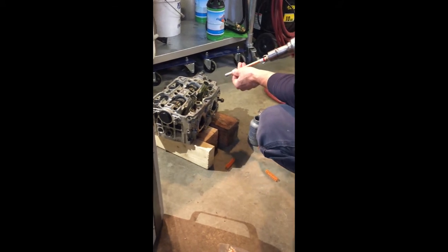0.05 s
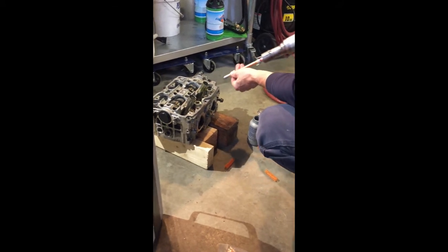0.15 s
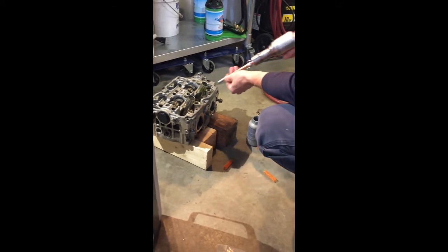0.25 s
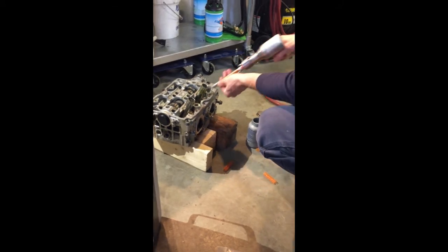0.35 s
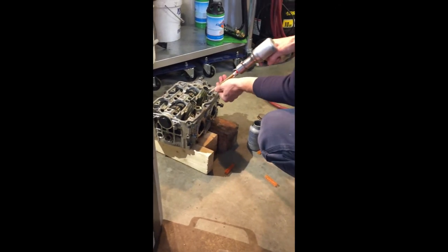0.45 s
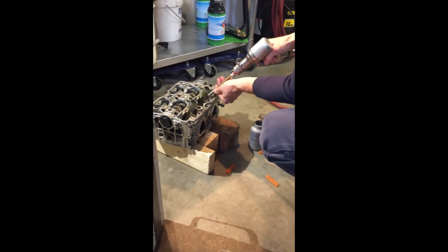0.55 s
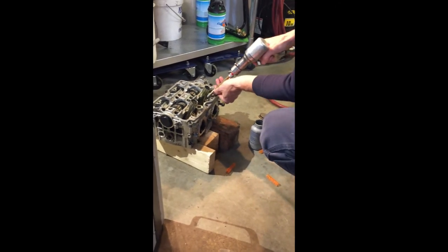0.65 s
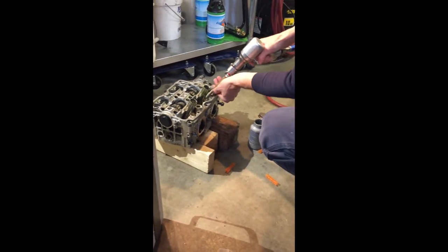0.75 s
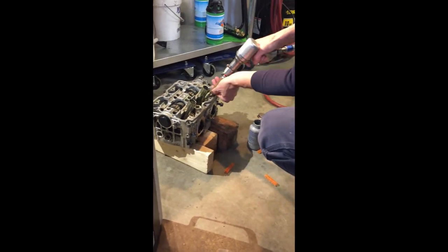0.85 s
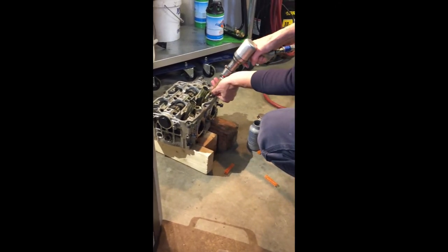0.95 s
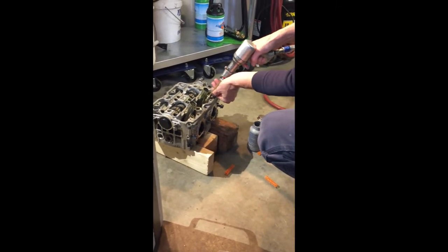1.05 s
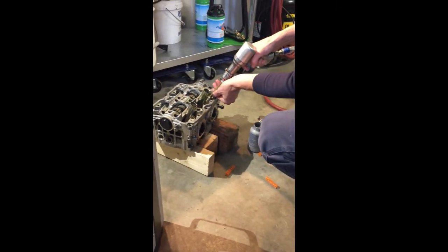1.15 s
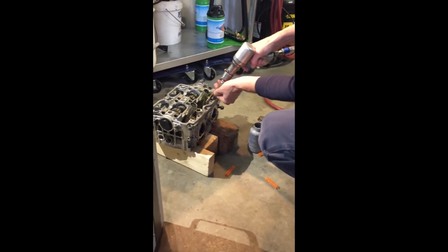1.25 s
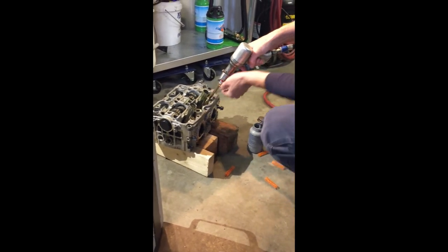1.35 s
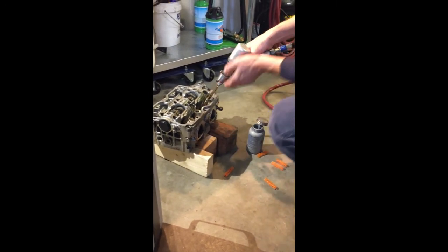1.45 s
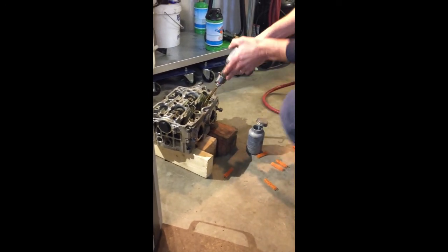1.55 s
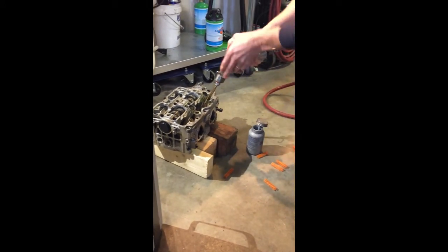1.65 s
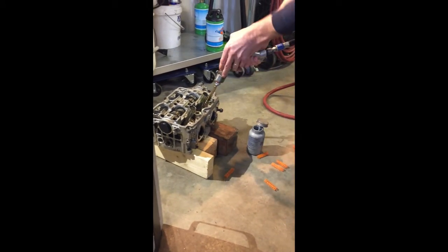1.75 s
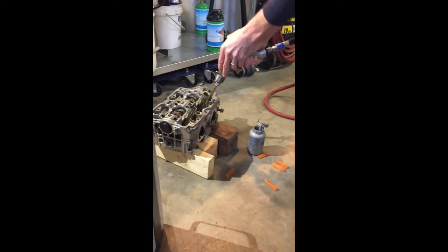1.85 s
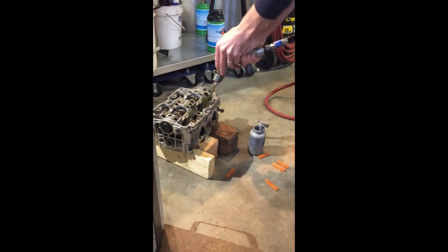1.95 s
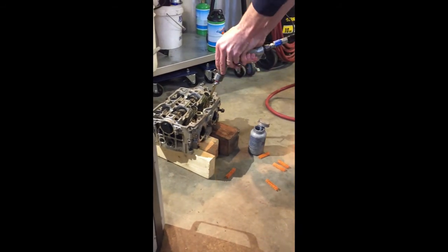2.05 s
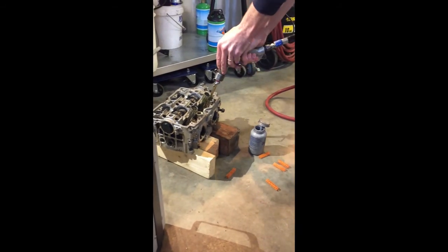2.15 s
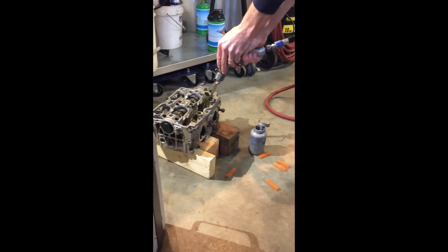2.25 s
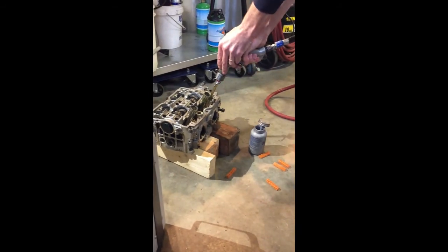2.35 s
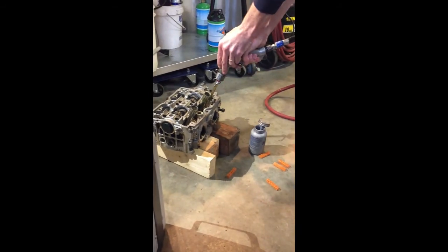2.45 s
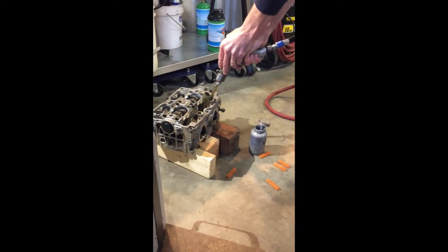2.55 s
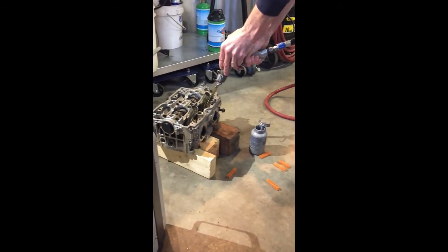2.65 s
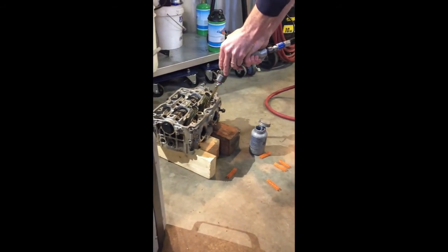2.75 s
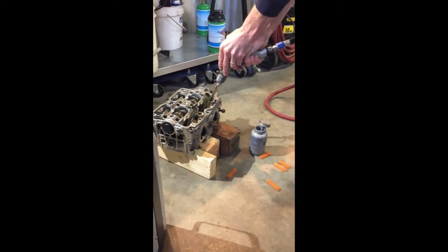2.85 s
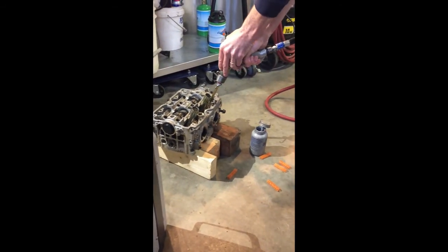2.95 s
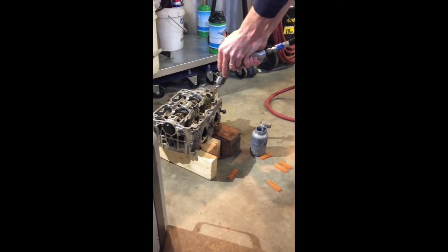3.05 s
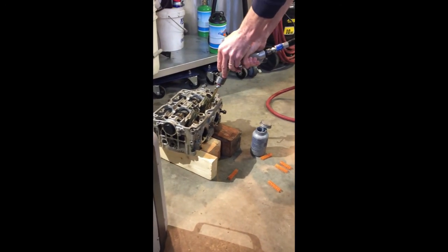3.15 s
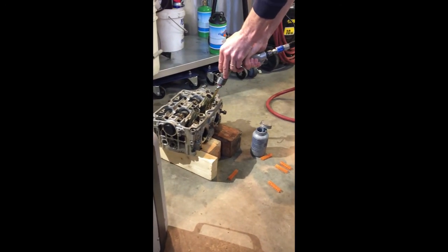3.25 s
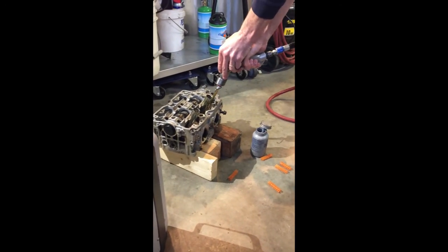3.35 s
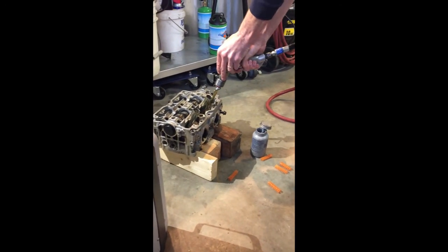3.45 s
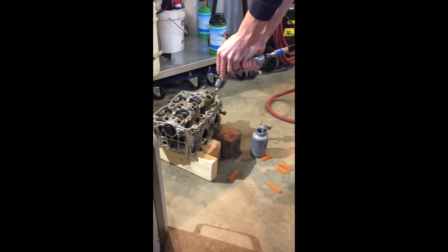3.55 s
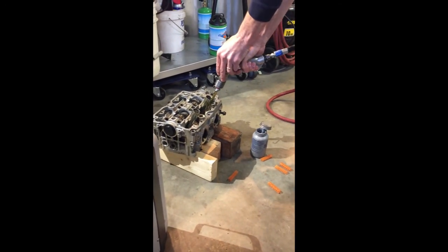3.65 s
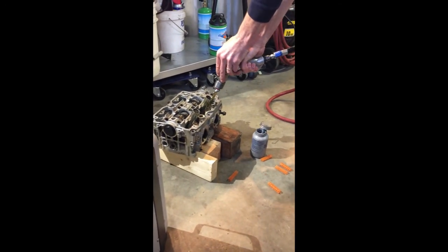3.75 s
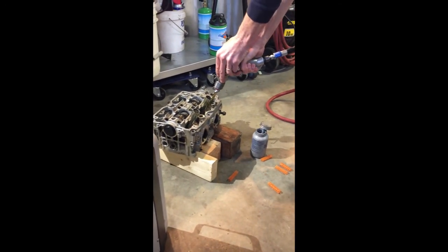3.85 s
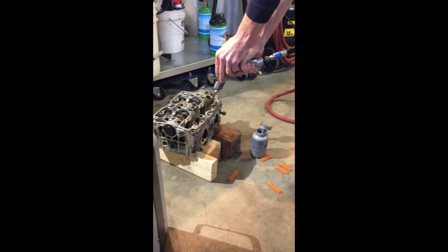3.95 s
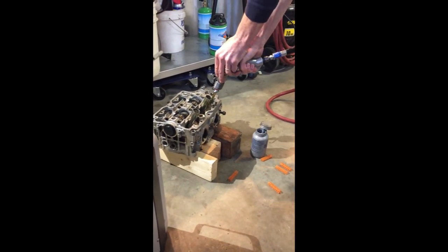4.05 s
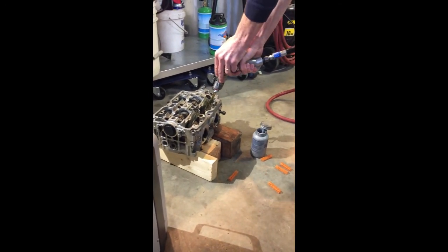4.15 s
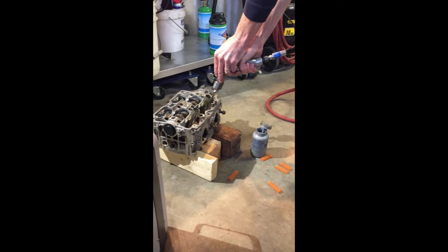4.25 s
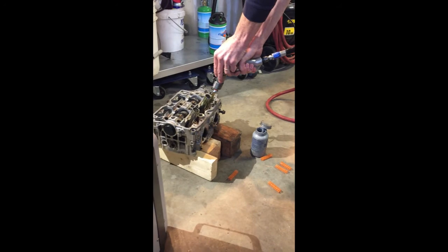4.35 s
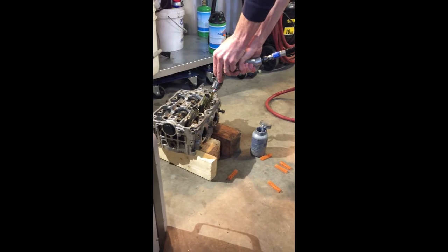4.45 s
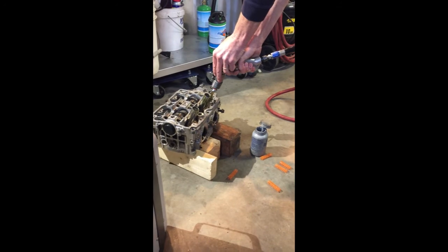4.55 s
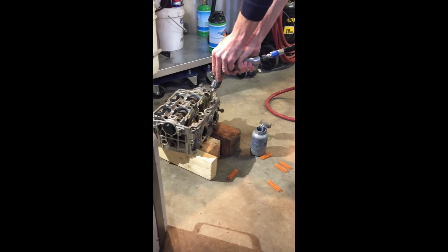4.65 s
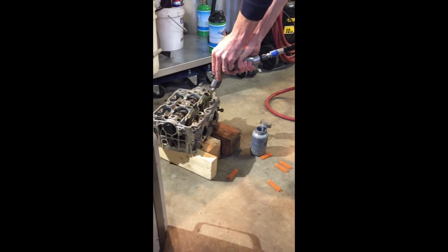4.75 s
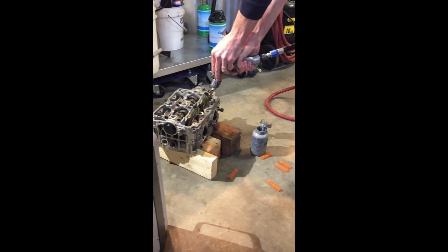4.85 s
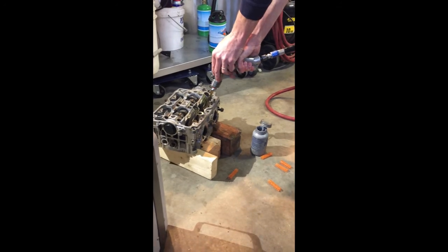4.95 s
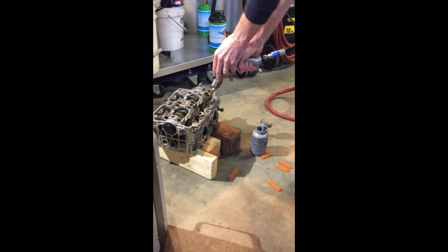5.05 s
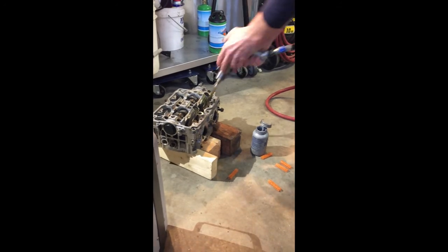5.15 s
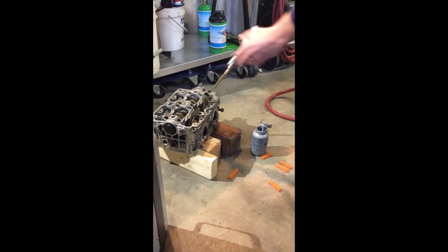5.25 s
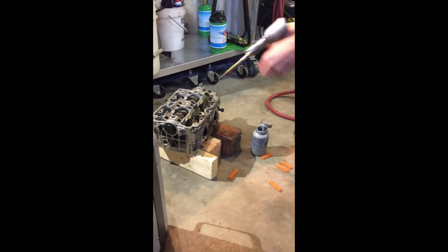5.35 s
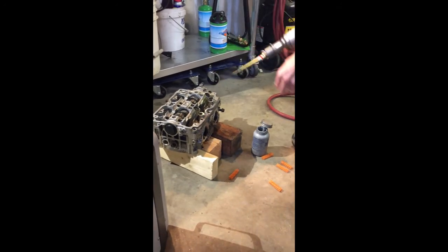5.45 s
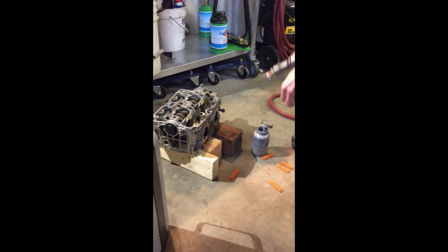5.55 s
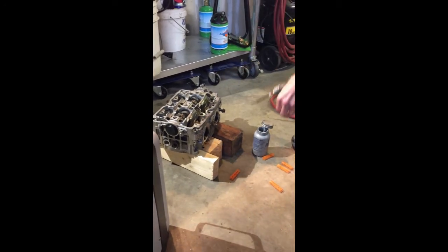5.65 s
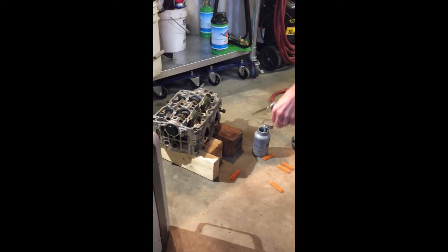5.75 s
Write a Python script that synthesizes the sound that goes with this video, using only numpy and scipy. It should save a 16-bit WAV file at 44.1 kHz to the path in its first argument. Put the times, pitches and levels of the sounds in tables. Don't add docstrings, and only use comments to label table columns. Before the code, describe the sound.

Quiet room rumble and thin air hiss surround small metallic ticks and soft handling bumps. Then a pneumatic hammer bangs steel into an engine casting: a few uneven blows, a short gap, and a long rapid machine-gun rattle. Each hit is bright, ringing and distorted with low thumps at the close microphone. It slows to separate blows, a metallic ring fades in the short garage echo, and brief scuffs follow.

```python
import sys
import numpy as np
from scipy import signal
from scipy.fft import rfft, irfft, next_fast_len
from scipy.io import wavfile
from scipy.ndimage import map_coordinates

SR = 44100
rng = np.random.default_rng(int(sys.argv[2]) if len(sys.argv) > 2 else 0)


def put_to_file(sound):
    columns = np.atleast_2d(sound).T
    safe = np.clip(columns, -1, 1)
    whole_steps = np.round(safe * 32767)
    wavfile.write(sys.argv[1], SR, whole_steps.astype(np.int16))


def rack_gain(trim_db):
    fader = np.asarray(trim_db, float)
    return 10 ** (fader / 20)


N = 256220

# frequency [Hz], density [dB per Hz].
AIR = [(20, -36.5), (55, -11.5), (75, -0.5), (300, -7.5), (500, -12.5), (1040, -11.5), (1800, -13),
       (2500, -21), (3800, -21.5), (4500, -28), (7700, -38.5), (9300, -36), (16000, -42.5)]
# frequency [Hz], width [Hz], level [dB].
MOTOR_ORDERS = [(79.5, 1.75, -56), (115.8, 12, -59), (156.1, 2.3, -56), (240.1, 7.8, -58.5),
                (317.8, 3.6, -58.5), (401.6, 2.7, -56)]
# frequency [Hz], width [Hz], level [dB].
HALL_MODES = [(301.4, 25, -59), (596, 133, -55.5), (726, 43.5, -58.5), (888, 76, -56.5), (1014, 76, -55.5),
              (1317, 100, -56.5), (1666, 95, -57.5), (2104, 41, -70), (2340, 90, -65.5), (2950, 230, -67),
              (3690, 150, -77.5)]
# time [s], level [dB], echo delay [ms].
LEAK = [(0, -77, 1.5), (.4, -67, 1.45), (.85, -65, 1.3), (1.2, -68, 1.3), (1.9, -65, 1.44),
        (2.3, -70, 1.14), (3, -70.5, 1.14), (5.2, -73, 1.2), (5.81, -76, 1.14)]
# frequency [Hz], t60 [s].
GARAGE_T60 = [(100, 0.46), (600, 0.37), (2000, 0.46), (6000, 0.42), (15000, 0.25)]
# start [s], level [dB], tip ring [dB], holder ring [dB].
CLICKS = [(0.191, -36, 2, .5), (0.334, -18, -22, -31), (0.8677, -17.5, -6, -30), (0.9133, -16, -24, -10.5),
          (0.966, -28, -22, -17), (1.0044, -17.5, -29.5, -27), (1.014, -24, -25, -17), (1.079, -43, -30, 6),
          (1.1456, -18.5, -18, -28), (1.4644, -43, -26, -7)]
# frequency [Hz], spread [Hz], t60 [s].
LOOSE_MODES = [(15300, 160, 0.09), (5900, 500, 0.047), (9630, 900, 0.028), (1430, 850, 0.068)]
SHAFT_DB = [-12, -13]
# centre [s], half length [s], level [dB], centre frequency [Hz].
SCUFFS = [(0.096, 0.026, -50.5, 4500), (0.137, 0.0053, -48.5, 9000), (0.199, 0.011, -45, 2180),
          (0.91, 0.011, -44, 1000), (1.874, .008, -48.5, 6540), (1.944, .006, -51, 6000),
          (1.971, 0.014, -32.5, 1760), (2.091, 0.021, -42, 2980), (2.137, .01, -48, 3000),
          (2.237, 0.021, -50, 6000), (5.234, 0.009, -46, 3500), (5.298, 0.0054, -56, 10000),
          (5.723, 0.015, -43.5, 2970), (5.805, 0.011, -31.5, 3050)]
# start [s], level [dB], frequency [Hz].
KNOCKS = [
    (0.197, -31, 900),
    (1.014, -28.5, 450),
    (1.968, -24, 1740),
    (2.287, -25, 350),
]
# blow [s], level [dB], crest [ms], length [ms].
HARD_JOLTS = [(3.089, -6.5, 13.6, 38), (3.127, -5.5, 14.4, 30), (3.163, -5, 7.3, 16), (3.206, -8.5, 9.7, 7),
              (3.257, -17.5, 19, 3.6), (3.47, -17.5, 7.2, 24), (3.546, -18, 3.8, 17), (3.507, -11, 7.5, 20),
              (3.58, -6, 26.4, 3.9), (3.614, -12.5, 4.9, 15), (3.669, -12.5, 15.7, 27),
              (4.182, -14, 8.5, 6.3), (4.209, -6.5, 8.1, 10), (4.237, -17, 6.3, 16), (4.265, -12, 5.4, 29),
              (4.293, -15.5, 5.6, 18), (4.321, -13, 8, 6.2), (4.348, -9.5, 13.5, 34), (4.405, -10, 3.3, 22),
              (4.517, -13, 17, 30), (4.545, -8.5, 6.4, 13.4), (4.573, -15, 16.6, 22), (4.627, -6, 7.9, 2.5),
              (4.737, -6, 8.8, 4.4), (4.793, -8.5, 10.5, 9.7), (4.851, -12, 24, 15)]
# open [s], shut [s], level [dB], sag while held [dB per s].
TRIGGER = [
    (3.045, 3.25, -31, 185),
    (3.2, 3.4, -54.5, 19),
    (3.412, 5.1, -37, 6),
]
# start [s], puff [dB], low push [dB].
VALVE_PUFFS = [
    (3.044, -26.5, -22),
    (3.0719, -13, -38),
    (3.405, -31.5, -42),
    (3.4211, -20.5, -47.5),
]
# frequency [Hz], width [Hz], level [dB].
PORT_MODES = [(194.4, 78, -5.5), (581, 23, 3.5), (1000, 310, -4.5), (1840, 750, -6.5), (2620, 1020, -7),
              (6000, 13500, -17)]
# blow [s], crack [dB], exhaust puff [dB].
SLOW_BLOWS = [(3.089, -5, -30), (3.1266, -4.5, -13), (3.1634, -8, -13.5), (3.2064, -13, -46),
              (3.2571, -22, -44.5), (3.4363, -11, -33), (3.4702, -7, -14.5), (3.5075, -11.5, -12.5),
              (4.9172, -14, -30.5), (4.9564, -15, -37), (5.0007, -15, -38), (5.0511, -16.5, -47.5)]
# blow [s], crack [dB], exhaust puff [dB].
RUN_MARKS = [(3.5464, -8, -17), (3.6138, -10, -19.5), (3.6698, -11, -22), (3.7294, -12.5, -22.5),
             (3.7875, -10.5, -24), (3.8991, -11.5, -22), (4.154, -11.5, -25), (4.489, -12, -25),
             (4.682, -10, -21.5), (4.8217, -11.5, -25), (4.8818, -11.5, -30)]
# time [s], favoured frequency [Hz], block thud [dB].
SEATING = [(3.08, 13000, -12), (3.2, 13100, -31), (3.3, 15500, -51), (3.44, 16000, -22.5),
           (3.5, 15400, -14), (3.52, 3480, -35), (3.72, 3730, -35.5), (3.9, 5900, -18), (4.05, 8760, -20.5),
           (4.2, 11200, -35), (4.45, 12400, -35), (4.55, 13300, -40), (4.57, 3520, -36), (4.7, 3300, -42),
           (5.06, 3000, -36.5)]
# frequency [Hz], density [dB per Hz].
CRACK = [(180, -20), (300, -14), (577, -2), (1480, -8), (1770, -6.5), (4850, -9), (5830, -8),
         (10700, -11.5), (15200, -7), (16500, -74.5)]
# frequency [Hz], width [Hz].
SHANK_MODES = [(5900, 550), (9300, 1040), (11600, 1700), (15450, 260)]
# level over the crack [dB], gain when favoured [dB], reach [octaves].
SHANK_DRIVE = [(-15.5, 3, 0.61), (-16, 8, 0.33), (-25, 18, 0.34), (-17.5, 7, 0.28)]
# frequency [Hz], level [dB], t60 [s].
CASTING_MODES = [(172, -1, 0.037), (585, -5, 0.06), (1000, -4.5, 0.081), (1754, -5, 0.25),
                 (1806, -16, 0.13), (722, -10, 0.075), (2210, -17, 0.063), (3734, -5, 0.033),
                 (8409, -24.5, 0.11), (15800, -21.5, .05)]
# start [s], frequency [Hz], level [dB], t60 [s].
FREE_RINGS = [
    (3.2575, 1775, -28, .14),
    (4.916, 1750, -35, .2),
    (5.001, 1750, -34, .2),
    (5.053, 1750, -27, .4),
    (5.053, 1783, -36, .2),
    (5.053, 5865, -49, 1.5),
    (5.053, 5869, -61, 1.2),
]


def unit(x):
    return x / np.sqrt(np.mean(x ** 2) + 1e-20)


def along(points, hz):
    f, v = np.transpose(points)
    return np.interp(np.log(hz + 1), np.log(f + 1), v)


def curves(rows, at_s):
    s, *cols = np.transpose(rows)
    return [np.interp(at_s, s, c) for c in cols]


def filtered(x, response):
    m = next_fast_len(len(x) + SR // 2)
    return irfft(rfft(x, m) * response(np.fft.rfftfreq(m, 1 / SR)), m)[:len(x)]


def peak(hz, width_hz):
    return lambda f: 1j * f * width_hz / (hz * hz - f * f + 1j * f * width_hz)


def noise(response):
    return unit(filtered(rng.standard_normal(N), response))


def train(times_s, db, shape):
    marks = np.bincount(np.round(np.asarray(times_s) * SR).astype(int), rack_gain(db), N)
    return signal.fftconvolve(marks, shape)[:N]


def swell(rise_s, fall_s):
    t = np.arange(SR // 8) / SR
    shape = (1 - np.exp(-t / rise_s)) ** 2 * np.exp(-t / fall_s)
    return shape / shape.max()


def add_at(line, start_s, sound):
    line[round(start_s * SR):][:len(sound)] += sound


def ringing(t, hz, db, t60_s):
    return rack_gain(db - 60 * t / t60_s) * np.sin(2 * np.pi * hz * t)


def motor_and_air():
    def lines(f):
        power = sum(rack_gain(2 * db) * np.abs(peak(hz, width_hz)(f)) ** 4 / width_hz
                    for hz, width_hz, db in [*MOTOR_ORDERS, *HALL_MODES])
        return np.sqrt(power * SR / 1.17)

    air = rack_gain(-46.5) * noise(lambda f: rack_gain(along(AIR, f)))
    return air + filtered(rng.standard_normal(N), lines)


def gain_control(x):
    start_s, hold_s, share_left, recovery_s = 3.07, 2.336, 0.33, 0.33
    free_s = start_s + hold_s
    corners_s = [start_s - .03, start_s + .03, free_s - .02, free_s + .022, free_s + recovery_s]
    duck = np.interp(np.arange(N) / SR, corners_s, [0, 1, 1, share_left, 0])
    bass = filtered(x, lambda f: 1 / (1 + (f / 200) ** 4))
    return rack_gain(-1.5 - 7.5 * duck) * (x - bass) + rack_gain(-2.5 - 14 * duck) * bass


def leak():
    t = np.arange(N) / SR
    db, delay_ms = curves(LEAK, t)
    jet = noise(lambda f: peak(14500, 6000)(f) ** 2)
    drift = map_coordinates(rng.standard_normal(size=40), [t * 5])
    delay_samples = (delay_ms + 0.013 * drift) * SR / 1000
    echo = map_coordinates(jet, [np.arange(N) - delay_samples], mode="wrap")
    return rack_gain(db + 1.5 * drift) * (jet + 0.58 * echo)


def garage(x):
    out, step = np.zeros(N + 2 * SR), 4096
    for a in range(0, N, step):
        hz, t, z = signal.stft(rng.standard_normal(SR * 3 // 4), SR, nperseg=256)
        decay = rack_gain(-60 * t / along(GARAGE_T60, hz)[:, None])
        tail = signal.istft(z * decay, SR, nperseg=256)[1]
        wet = signal.fftconvolve(x[a:a + step], tail / np.linalg.norm(tail))
        out[a + 200:][:len(wet)] += wet
    return out[:N]


def scuffs():
    lead = SR // 8
    u = np.arange(-lead, lead) / SR
    line = np.zeros(N + SR)
    for s, half_s, db, hz in SCUFFS:
        grain_db = 1.6 * np.repeat(rng.standard_normal(len(u) // 64 + 1), 64)[:len(u)]
        grit = rng.standard_normal(len(u)) * rack_gain(grain_db)
        rub = unit(filtered(grit, lambda f: peak(hz, .6 * hz)(f) + 0.037 * f / (f + 3000)))
        add_at(line, s, rack_gain(db) * rub * np.exp(-.5 * (u / half_s) ** 2))
    return line[lead:][:N]


def knocks():
    line, t = np.zeros(N + SR), np.arange(SR // 4) / SR
    for s, db, hz in KNOCKS:
        add_at(line, s, ringing(t, hz, db, 0.016))
    return line[:N]


def punch_clicks():
    line, t = np.zeros(N + SR), np.arange(SR // 4) / SR
    for s, db, tip_db, holder_db in CLICKS:
        tick = rack_gain(-8 - 60 * t / 0.016) * filtered(rng.standard_normal(len(t)), peak(5700, 13000))
        for level_db, (hz, spread_hz, t60_s) in zip([tip_db, *SHAFT_DB, holder_db], LOOSE_MODES):
            mode_hz = hz + spread_hz * rng.uniform(-0.79, 1, size=(20, 1))
            phase = 2 * np.pi * (mode_hz * t + rng.random(mode_hz.shape))
            tick += 0.15 * rack_gain(level_db - 60 * t / t60_s) * np.sin(phase).sum(axis=0)
        add_at(line, s, rack_gain(db - 2) * tick * (1 - np.exp(-t / 0.00027)))
    return line[:N]


def strokes():
    stroke_s, jitter_s, crack_scatter_db, puff_scatter_db = .0283, .00022, 1.03, 1
    s = np.transpose(RUN_MARKS)[0]
    done = np.r_[0, np.cumsum(np.round(np.diff(s) / stroke_s))]
    count = np.arange(done[-1] + 1)
    run = np.transpose([np.interp(count, done, c) for c in np.transpose(RUN_MARKS)])
    run = run + rng.standard_normal(run.shape) * [jitter_s, crack_scatter_db, puff_scatter_db]
    rows = np.r_[SLOW_BLOWS, run]
    return rows[rows[:, 0].argsort()].T


def jolts(s, puff_db):
    line, t = np.zeros(N + SR), np.arange(1, SR // 16) / SR
    chance = rng.standard_normal((len(s), 2))
    firm_db = np.maximum(curves(SEATING, s)[1] + 35, 0)
    nudge_db = puff_db + 3.5 - 0.57 * firm_db - 1.5 * chance[:, 0]
    nudge_crest_ms = 6.03 * rack_gain(1.2 * chance[:, 1])
    rows = np.c_[s, nudge_db, nudge_crest_ms, np.full(len(s), 24)]
    for near_s, *hard in HARD_JOLTS:
        rows[np.abs(s - near_s).argmin(), 1:] = hard
    for start_s, db, crest_ms, length_ms in rows:
        swing = np.cos(np.pi * np.log(1000 * t / crest_ms) / np.log(1.9))
        envelope = np.exp(-(1000 * t / length_ms) ** 2) * (1 - np.exp(-(t / 0.00033) ** 2))
        add_at(line, start_s, rack_gain(db) * swing * envelope)
    return line[:N]


def trigger_hiss():
    opens_db_per_s, shuts_db_per_s = 5001, 83.5
    t, level = np.arange(N) / SR, np.zeros(N)
    for open_s, shut_s, db, sag_db_per_s in TRIGGER:
        rise_db = opens_db_per_s * np.maximum(open_s - t, 0)
        sag_db = sag_db_per_s * np.clip(t - open_s, 0, shut_s - open_s)
        fall_db = shuts_db_per_s * np.maximum(t - shut_s, 0)
        level += rack_gain(db - rise_db - sag_db - fall_db)
    return level * noise(peak(7000, 12000))


def exhaust(s, puff_db):
    def port(f):
        return sum((-1) ** k * rack_gain(db) * peak(hz, width_hz)(f) for k, (hz, width_hz, db) in enumerate(PORT_MODES))

    valve_s, valve_db, push_db = np.transpose(VALVE_PUFFS)
    times_s = np.r_[s[1:] - .0148, valve_s]
    level_db = np.r_[puff_db[1:] + 3, valve_db]
    puffs = train(times_s, level_db - 2.5, swell(0.0011, 0.013)) * noise(port)
    pop = filtered(signal.unit_impulse(SR // 5), lambda f: port(f) / (1 + 1j * f / 1500) ** 2)
    pops = train(times_s, level_db + 2, pop / pop.max())
    t = np.arange(SR // 20) / SR
    pushes = train(valve_s, push_db, np.sin(2 * np.pi * 170 * t) * np.exp(-t / 0.0086))
    return puffs + pops + pushes


def casting_ring(s, crack_db):
    line, t = np.zeros(N + SR), np.arange(SR) / SR
    thud_db = curves(SEATING, s)[1]
    loosened_db = 2.5 * (s - 4.1)
    for hz, db, t60_s in CASTING_MODES:
        drive_db = thud_db + 2.5 if hz < 300 else crack_db + loosened_db - 10.5
        scatter_db = 2.4 * rng.standard_normal(len(s))
        line[:N] += train(s, drive_db + scatter_db, ringing(t, hz, db, t60_s))
    for start_s, hz, db, t60_s in FREE_RINGS:
        add_at(line, start_s, ringing(t, hz, db, t60_s))
    return line[:N]


def shank_ring(s, crack_db):
    out, t = np.zeros(N), np.arange(SR // 20) / SR
    favoured_hz = curves(SEATING, s)[0]
    for (hz, width_hz), (rest_db, gain_db, reach_oct) in zip(SHANK_MODES, SHANK_DRIVE):
        favour = np.exp(-(np.log2(hz / favoured_hz) / reach_oct) ** 2)
        level_db = crack_db + rest_db + gain_db * favour + 11.5 + rng.standard_normal(len(s))
        u = np.pi * width_hz * t
        out += train(s, level_db, 1.84 * u * np.exp(1 - 1.25 * u) * np.sin(2 * np.pi * hz * t))
        chatter = noise(lambda f: peak(hz, 2 * width_hz)(f) ** 2)
        out += train(s, level_db - 7, swell(0.00043, 0.0051)) * chatter
    return out


def blow_crack(s, crack_db):
    crack = train(s - .0004, crack_db, swell(0.00051, 0.0039)) * noise(lambda f: rack_gain(along(CRACK, f)))
    snap_db = 0.22 * (crack_db + 11.5) - 18
    return crack + train(s, snap_db, swell(.00012, .00081)) * noise(peak(6300, 16000))


def scene():
    s, crack_db, puff_db = strokes()
    crack, shank, ring = blow_crack(s, crack_db), shank_ring(s, crack_db), casting_ring(s, crack_db)
    tool = crack + exhaust(s, puff_db) + trigger_hiss()
    hands = punch_clicks() + knocks() + scuffs()
    bounce = rack_gain(-18) * np.roll(crack + shank, round(.0058 * SR))
    reverb = garage(rack_gain(-5.5) * (tool + shank) + rack_gain(-11) * ring + rack_gain(-7) * hands)
    background = gain_control(motor_and_air()) + leak()
    return (tool + shank + ring + hands + bounce + reverb + jolts(s, puff_db) + background)[None]


def top_cut(x):
    return signal.sosfilt(signal.butter(12, 16860, fs=SR, output="sos"), x)


def record(dry):
    x = filtered(dry[0], lambda f: (1 - .5 * peak(10400, 900)(f)) * f ** 4 / (f ** 4 + 38 ** 4))
    x = x / (1 + np.abs(x / .95) ** 8) ** (1 / 8)
    x = filtered(x, lambda f: rack_gain(np.interp(f, [15650, 15850, 16600, 16850], [0, -35, -37, -90])))
    return top_cut(x[None])


dry = scene()
out = record(dry)
put_to_file(out)
```